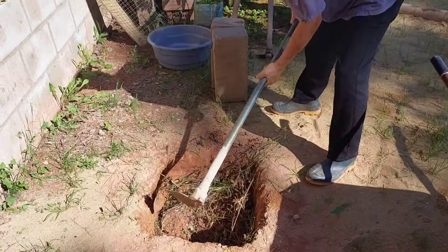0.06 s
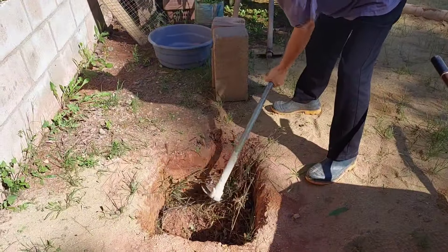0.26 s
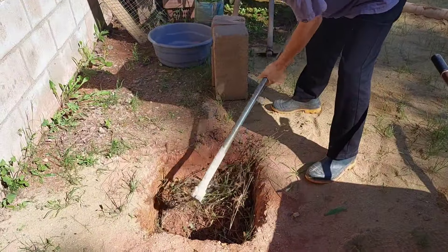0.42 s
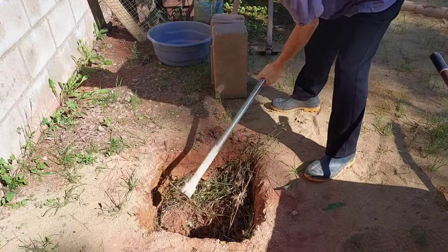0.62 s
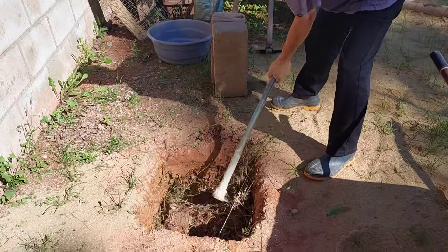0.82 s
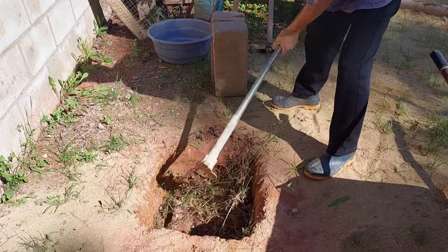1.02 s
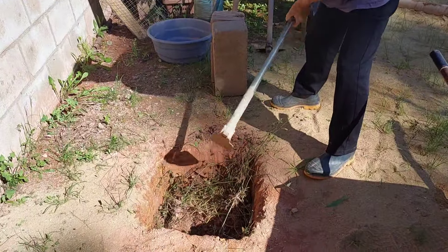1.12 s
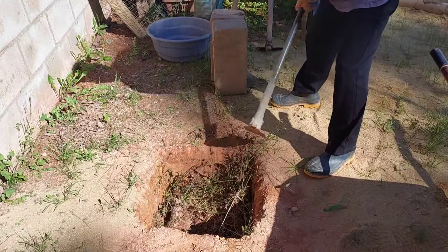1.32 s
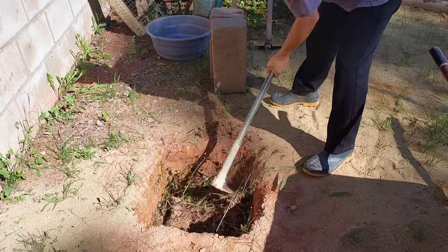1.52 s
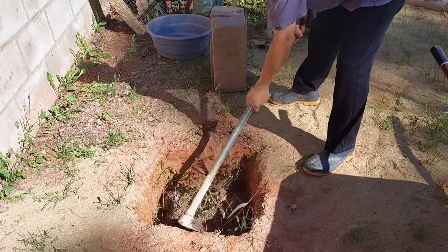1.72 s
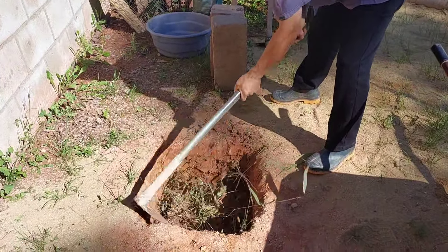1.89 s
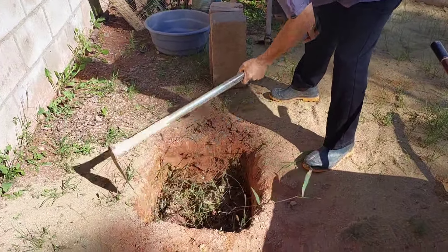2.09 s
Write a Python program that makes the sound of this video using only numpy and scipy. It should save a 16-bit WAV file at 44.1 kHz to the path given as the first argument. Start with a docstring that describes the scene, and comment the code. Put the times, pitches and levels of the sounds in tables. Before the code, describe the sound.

A metal hoe chops twice into soil and dry grass, then scrapes, with wind rumbling.

```python
"""Wind rumbles on the microphone and faint birds whistle over the quiet hiss of a garden.
A steel hoe chops twice into a pit of soil and cut grass: each blow crunches, thuds and shakes
the hoe. It scrapes in a third time, clips a pebble and drags the heap out. Grit rubbing along
the blade makes it ring, and crumbs and stalks rustle after each stroke."""
import sys
import numpy as np
from scipy import signal
from scipy.fft import rfft, irfft
from scipy.io import wavfile
from scipy.ndimage import uniform_filter1d

SR = 44100
rng = np.random.default_rng(int(sys.argv[2]) if len(sys.argv) > 2 else 0)


def transcribe(signal):
    """Save signal, clipped to [-1, 1], as a 16-bit WAV file at the path in sys.argv[1]."""
    frames = np.atleast_2d(signal).T
    limited = np.clip(frames, -1, 1)
    pcm = np.round(limited * 32767).astype(np.int16)
    wavfile.write(sys.argv[1], SR, pcm)


N = 94815
T = np.arange(N) / SR

# A TONE table says how strong each pitch is next to the others. "side" is left level minus right.
# outdoor hiss (f/Hz, level/dB)
AIR_TONE = [(150, -19.5), (250, 0.5), (407, -14), (674, -8.5), (1280, -20.5), (7310, -24), (9010, -30.5),
            (16000, -29)]
# how loud that hiss is over time (t/s, level/dB)
AIR_LEVEL = [(0, -60.5), (.6, -59), (1.3, -62)]
# gusts on the microphone (peak t/s, level/dB, rise/s, fall/s, added flutter/dB, side/dB)
GUSTS = [(0.041, -33, 0.037, 0.049, -9.5, 13), (0.271, -31, 0.019, 0.057, -8.5, 7),
         (0.469, -26.5, 0.038, 0.07, -24, 10.5), (0.534, -30.5, 0.011, 0.013, 5, 39),
         (0.593, -22, 0.008, 0.013, -18, 1.5), (0.642, -30, 0.014, 0.027, 5, 16.5),
         (0.764, -25.5, 0.025, 0.099, -8, -0.5), (0.865, -28, 0.039, 0.072, -21, -12),
         (1.127, -30.5, 0.036, 0.029, -19, 12), (1.179, -24.5, 0.038, .014, -46, 13.5),
         (1.32, -40, 0.084, 0.5, -12.5, 3.5), (1.565, -26, 0.0077, 0.0037, -19.5, 26),
         (1.661, -24, 0.009, 0.042, -11, 23), (1.804, -29, 0.041, 0.15, -12, 3.5)]
# deep rumble of the wind (f/Hz, level/dB)
WIND_TONE = [(20, -22.5), (46, 1), (60, 6), (80, 2), (170, -20.5), (250, -34.5), (1000, -73.5)]
# higher flutter of a gust (f/Hz, level/dB)
FLUTTER_TONE = [(40, -34), (90, 11), (160, -2), (330, -17.5), (1500, -67.5)]
# bird whistles (start t/s, length/s, first f/Hz, last f/Hz, level/dB, level change/dB, wander/share)
WHISTLES = [(0, 0.047, 4260, 3920, -65.5, -5.5, 0.024), (0.039, 0.044, 3740, 3370, -63.5, 7.5, 0.024),
            (0.143, 0.057, 3590, 3340, -73, 10, 0.012)]
# stalks brushed, crumbs sliding (peak t/s, level/dB, rise/s, fall/s, side/dB)
RUSTLES = [(.1855, -44.5, 0.0012, 0.015, 4.5), (.33, -54.5, 0.041, 0.068, 2), (.689, -44, 0.0042, 0.097, 3),
           (.77, -40.5, 0.01, 0.039, 0), (.865, -52, 0.019, 0.056, 2), (1.56, -43, 0.05, 0.12, 1.5),
           (1.63, -50.5, 0.13, 0.051, 3), (1.775, -50, 0.084, 0.15, 3), (1.942, -47.5, 0.0021, 0.0022, 7)]
# dry grass and earth (f/Hz, level/dB)
RUSTLE_TONE = [(150, -40.5), (500, 0.5), (1500, 0), (6000, 2), (9000, -2), (16000, 0)]
# stalks snapping, crumbs landing (t/s, level/dB, side/dB)
SNAPS = [(1.633, -48, 1), (1.711, -45, 15), (1.835, -44.5, 2)]
# blade driven into the soil (t/s, crunch/dB, clods/dB, time to stop/s, thud/dB, handle ring/dB,
# edge ping/dB, pivot f/Hz, crunch dip away from it/dB per octave, side/dB)
CHOPS = [(0.2098, -20, -28.5, 0.0015, -9, -20.5, -54, 2200, 0.5, 2),
         (0.7138, -23.5, -31, 0.0059, -16, -31, -26, 4040, 1.1, 2.5)]
# edge cutting stalks and soil (f/Hz, level/dB)
CRUNCH_TONE = [(100, 0.5), (820, 2), (1560, -0.5), (1800, -9.5), (2300, -5.5), (2900, -0.5), (3300, -10.5),
               (3900, -0.5), (4400, -9), (5000, -4), (6300, -5), (7200, -8.5), (9300, -11), (11200, -9),
               (16000, -18)]
# blade butting against hard earth (t/s, level/dB, side/dB)
KNOCKS = [(0.2096, -6.5, 2.5), (.2152, -14.5, 4), (0.7145, -20, -3), (.7235, -19.5, -1)]
# dull blow on earth (f/Hz, level/dB)
KNOCK_TONE = [(40, -27), (120, 1.5), (230, 1.5), (500, 3.5), (900, -7.5), (1700, -15), (2400, -9.5),
              (4000, -28.5), (16000, -54)]
# notes of the hoe held by the soil (f/Hz, level/dB, time to fade by 60 dB/s)
HANDLE_NOTES = [(219, 0, 0.055), (331.7, 3, 0.078), (519.4, 1.5, 0.1), (878, 2, 0.064), (1238, -17, 0.082),
                (2260, -3, 0.035), (2510, -4, 0.031), (5820, 5, 0.017)]
# notes of the buried edge (f/Hz, level/dB, time to fade by 60 dB/s)
EDGE_NOTES = [(1530, 1.5, 0.044), (2940, 2.5, 0.055), (6690, -4.5, 0.056)]
# blade singing on as it slides free (start t/s, length/s, f/Hz, level/dB, level change/dB)
RINGS = [(0.272, 0.055, 1390, -40.5, -5), (0.312, .11, 3540, -48, -18), (.332, 0.23, 2660, -48.5, -24)]
# blade sliding over grit (peak t/s, level/dB, rise/s, fall/s, blade ring/dB, pivot f/Hz,
# how much the ring dips (+) or rises (-) away from it/dB per octave, coarseness/dB, side/dB)
SCRAPES = [(0.2777, -38.5, .0009, 0.017, 6, 1920, 1.5, 4.5, -3),
           (0.294, -37, 0.0065, 0.014, 4, 7500, 0.5, -2, 1),
           (0.368, -47.5, 0.0032, 0.011, -0.5, 5500, 5, 1, 1),
           (1.4151, -35, 0.0038, 0.013, -12, 4500, -1.5, -2, 3),
           (1.426, -30.5, 0.0028, 0.012, -4.5, 5000, -3, 2, 2),
           (1.433, -36.5, 0.0036, 0.013, 4, 780, 3, 3.5, 0.5),
           (1.778, -60.5, 0.03, 0.013, 9.5, 6900, 8, 5, -3.5)]
# grit rubbing on steel (f/Hz, level/dB)
GRIT_TONE = [(100, -9), (400, -23), (700, 4), (1200, -5), (2700, 1), (5000, 6), (7500, 1.5), (9200, -0.5),
             (11000, 0.5), (16000, -6)]
# notes of the free blade (f/Hz, level/dB)
BLADE_NOTES = [(650, 0), (954, 1), (1374, -6), (1985, -7), (2265, -8), (2640, -2), (2865, -2), (4040, -5),
               (4875, -2), (5085, -5), (5615, -5), (6378, -7), (6826, 1), (7535, -9)]
# thin bird twitter (peak t/s, level/dB, rise/s, fall/s, side/dB)
TWITTERS = [(.585, -60, 0.034, 0.11, 1)]
# its narrow, high band (f/Hz, level/dB)
TWITTER_TONE = [(3000, -56), (5200, -8), (6000, 0), (6900, 0), (7700, -13), (9500, -46)]
# faint swishes (peak t/s, level/dB, rise/s, fall/s, side/dB)
SWISHES = [(.665, -45.5, 0.031, 0.057, 2.5), (1.055, -51, 0.023, 0.2, 3), (1.087, -45, 0.0056, 0.069, 0),
           (1.385, -51, 0.019, 0.17, 1.5)]
# their hollow sound (f/Hz, level/dB)
SWISH_TONE = [(200, -43.5), (480, -5.5), (630, 5.5), (730, 1), (910, 4.5), (1080, -10), (1800, -13),
              (2500, -46)]
# blade clipping a pebble (t/s, level/dB, fall/s, side/dB)
CLICKS = [(1.6639, -35, 0.0084, 0)]
# steel on stone (f/Hz, level/dB)
CLICK_TONE = [(400, -15), (950, -9), (2270, -1.5), (2600, -5), (2850, 5.5), (3300, 5), (3700, -9),
              (5100, 3.5), (6800, 2.5), (8000, -8.5), (16000, -9)]
# how far the left microphone opening is out of step with the right (f/Hz, phase/radians)
PORT_PHASE = [(250, 0.05), (850, 0.54), (1300, -1.75), (2400, -0.49), (3500, -0.95), (12000, -1.56)]

BREEZE_DB = -44
FLICKER_DB = 2.5  # unsteady level of the whistles and the singing blade
CRUMBS_PER_S, CRUMBS_DB, SNAP_S = 170, -4.5, 0.0031
ENTRY_S, ENTRY_DB, STOP_S, SETTLE_S, SETTLE_DB = 0.00478, -8, 0.0067, 0.019, -18  # stages of a chop
CLOD_S, CLOD_TAIL_DB = 0.012, 2.5
THUD_HZ, THUD_FADE_S, THUD_RISE_S = 107.8, 0.046, 0.0034
SING_RAMP_S, SING_WANDER_HZ = 0.013, 11
BLADE_WIDTH_HZ = 24  # width of a blade note at 1 kHz; wider notes die sooner
CLICK_RISE_S = 0.00052
LOW_CUT_HZ, HIGH_CUT_HZ = 32, 16000


def amp(db):
    """Turns decibels into a number to multiply by."""
    return 10 ** (np.asarray(db) / 20)


def unit(x):
    """Scales a signal to an average strength (rms) of 1."""
    return x / np.sqrt(np.mean(x ** 2) + 1e-20)


def pan(db):
    """Left and right gains for a level difference."""
    gains = amp(np.array([db, -db]).reshape(2, -1) / 2)
    return gains / np.sqrt(np.mean(gains ** 2, 0))


def response(tone, size=8192):
    """The sound of one tiny tap with the given tone, scaled to an energy of 1."""
    hz, db = np.transpose(tone)
    bins_hz = abs(np.fft.fftfreq(size, 1 / SR))
    log_gain = np.log(amp(np.interp(np.log(bins_hz + 1), np.log(hz + 1), db)))
    tap = np.fft.ifft(np.exp(np.conj(signal.hilbert(log_gain)))).real[:size // 2]
    return tap / np.linalg.norm(tap)


def colour(x, tap):
    """Gives both channels the tone of a tap."""
    return signal.fftconvolve(x, tap[None], axes=1)[:, :N]


def noise(alike, grain_db=0):
    """Stereo noise; alike is the share both sides have in common, grain_db makes it gritty."""
    both, left, right = rng.standard_normal((3, N))
    grains = amp(grain_db * np.minimum(rng.exponential(1, N // 8 + 1), 4.5)).repeat(8)[:N]
    return unit(grains * (np.sqrt(alike) * both + np.sqrt(1 - alike) * np.array([left, right])))


def swell(s, rise, fall):
    """A level that climbs smoothly to a peak at time s, then dies away."""
    return np.exp(-(np.minimum(T - s, 0) / rise) ** 2 / 2 - np.maximum(T - s, 0) / fall)


def swells(rows):
    """Left and right level of overlapping swells."""
    powers = ((amp(db) * pan(side) * swell(s, rise, fall)) ** 2 for s, db, rise, fall, side in rows)
    return np.sqrt(sum(powers))


def waver(size):
    """Random drift, smoothed over size samples."""
    return unit(uniform_filter1d(uniform_filter1d(rng.standard_normal(N), size), size))


def struck(notes, t):
    """The dying notes of a struck object."""
    return sum(amp(db - 60 * t / t60) * np.sin(2 * np.pi * (hz * t + rng.random()))
               for hz, db, t60 in notes)


def tilt(tone, pivot_hz, dip_db):
    """Lowers a tone by dip_db for each octave away from the pivot; a negative dip_db raises it."""
    return [(hz, db - dip_db * abs(np.log2(hz / pivot_hz))) for hz, db in tone]


def echoes(x, wet_db, t60):
    """Adds short, thin echoes from the wall and the yard."""
    t = T[:SR // 2]
    taps = rng.standard_normal((2, len(t))) * (rng.random((2, len(t))) < 2000 / SR)
    taps *= amp(-60 * t / t60) * (t > .008)
    return x + amp(wet_db) * signal.fftconvolve(x, taps / np.linalg.norm(taps[0]), axes=1)[:, :N]


def air():
    """Quiet outdoor hiss, stronger on the left."""
    level = amp(np.interp(T, *np.transpose(AIR_LEVEL))) * pan(5.5)
    return level * colour(noise(0.12, grain_db=2.0), response(AIR_TONE))


def wind():
    """Air swirls at the microphone: a light breeze and gusts, the sharper ones with a flutter."""
    rumble = colour(noise(0.09), response(WIND_TONE))
    rumble /= np.sqrt(uniform_filter1d(rumble ** 2, size=1300, axis=1) + 1e-9)  # even out its level
    gusts = swells([(s, db, rise, fall, side) for s, db, rise, fall, _, side in GUSTS])
    flutter = swells([(s, db + extra, rise, fall, side) for s, db, rise, fall, extra, side in GUSTS])
    level = np.hypot(gusts, amp(BREEZE_DB) * pan(5.5))
    return rumble * level + colour(flutter * noise(0.52), response(FLUTTER_TONE))


def bird_whistles():
    """Faint whistles slide down in pitch, smeared by the yard."""
    out = np.zeros((2, N))
    for s, length, first_hz, last_hz, db, change_db, wander in WHISTLES:
        progress = np.clip((T - s) / length, 0, 1)
        hz = (first_hz + (last_hz - first_hz) * progress) * (1 + wander * waver(70))
        gate = np.minimum(np.minimum(progress, 1 - progress) * length / 0.0054, 1)
        level = amp(db + change_db * progress + FLICKER_DB * waver(450))
        out += gate * level * np.sin(2 * np.pi * np.cumsum(hz) / SR)
    return echoes(out, wet_db=2, t60=.3)


def loose_soil():
    """Fine earth and dry grass rustle, with larger crumbs and a few clear snaps among them."""
    snaps = swells([(s, db, SNAP_S / 10, SNAP_S, side) for s, db, side in SNAPS])
    crumbs = unit(rng.uniform(-1.02, 1, (2, N)) * (rng.random(N) < CRUMBS_PER_S / SR))
    grains = noise(0.44, grain_db=0.5) + amp(CRUMBS_DB) * crumbs
    return colour(swells(RUSTLES) * unit(grains) + snaps * noise(0.86), response(RUSTLE_TONE))


def chops():
    """The edge cuts stalks, crunches to a stop in the clods, knocks the ground and shakes the hoe."""
    out = np.zeros((2, N))
    blow = response(KNOCK_TONE)
    for s, crunch_db, clod_db, stop, thud_db, ring_db, ping_db, pivot_hz, dip_db, side in CHOPS:
        t = np.maximum(T - s, 0)
        since_stop = np.maximum(t - stop, 0)
        entering = amp(ENTRY_DB) * np.exp(-abs(T - s) / ENTRY_S)
        settling = np.exp(-since_stop / STOP_S) + amp(SETTLE_DB) * np.exp(-since_stop / SETTLE_S)
        cut = np.where(T < s, entering, settling)
        tone = response(tilt(CRUNCH_TONE, pivot_hz, dip_db))
        crunch = amp(crunch_db) * colour(cut * noise(0.76, grain_db=4.0), tone)
        crumble = (T > s) * np.maximum(cut, amp(CLOD_TAIL_DB) * np.exp(-since_stop / CLOD_S))
        clods = amp(clod_db) * colour(crumble * noise(1.0), blow)
        thud_level = amp(thud_db - 60 * t / THUD_FADE_S) * (1 - np.exp(-t / THUD_RISE_S))
        thud = thud_level * np.sin(2 * np.pi * THUD_HZ * t)
        ring = amp(ring_db) * struck(HANDLE_NOTES, t) + amp(ping_db) * struck(EDGE_NOTES, t)
        out += pan(side) * (crunch + clods + thud + ring * (1 - np.exp(-t / 0.0016)))
    knocks = sum(amp(db) * pan(side) * (np.arange(N) == round(s * SR)) for s, db, side in KNOCKS)
    return out - colour(knocks, blow / abs(blow).max())


def singing_blade():
    """Single notes of the blade swell, waver and fade as it slides out of the soil."""
    out = np.zeros(N)
    for s, length, hz, db, change_db in RINGS:
        progress = np.clip((T - s) / length, 0, 1)
        gate = np.minimum(np.minimum(progress, 1 - progress) * length / SING_RAMP_S, 1)
        cycles = np.cumsum(hz + SING_WANDER_HZ * waver(300)) / SR
        level = amp(db + change_db * progress + FLICKER_DB * waver(600))
        out += gate * level * np.sin(2 * np.pi * cycles)
    return out


def scrapes():
    """Grit rubs the blade and sets it ringing; where it touches changes the mix of its notes."""
    t = T[:SR // 4]
    out = np.zeros((2, N))
    for s, db, rise, fall, ring_db, pivot_hz, dip_db, coarse_db, side in SCRAPES:
        blade = np.zeros(len(t))
        for hz, note_db in tilt(BLADE_NOTES, pivot_hz, dip_db):
            width = BLADE_WIDTH_HZ * np.sqrt(hz / 1000)
            blade += amp(note_db) * width * np.exp(-np.pi * width * t) * np.sin(2 * np.pi * hz * t)
        stroke = amp(db) * pan(side) * swell(s, rise, fall)
        out += colour(stroke * noise(0.033, grain_db=coarse_db), response(GRIT_TONE))
        out += amp(ring_db) * colour(stroke * noise(0.58), blade / np.linalg.norm(blade))
    return out


def bird_twitter():
    """A thin, high twitter, heard as a brief swell of hiss."""
    return colour(swells(TWITTERS) * noise(0.25), response(TWITTER_TONE))


def swishes():
    """Soft, hollow rushes of middle pitch."""
    return colour(swells(SWISHES) * noise(0.27), response(SWISH_TONE))


def pebble_click():
    """A dry click of steel on a pebble, muffled by the soil."""
    level = swells([(s, db, CLICK_RISE_S, fall, side) for s, db, fall, side in CLICKS])
    return colour(level * noise(0.8, grain_db=1.5), response(CLICK_TONE))


def microphone_ports(x):
    """The microphone's two openings hear the hoe slightly out of step."""
    turn = np.interp(np.fft.rfftfreq(2 * N, 1 / SR), *np.transpose(PORT_PHASE))
    left = irfft(rfft(x[0], 2 * N) * np.exp(1j * turn))[:N]
    return np.array([left, x[1]])


def scene():
    """The hoe in the garden, with wind and birds."""
    blows = echoes(chops(), wet_db=-17.5, t60=0.36)
    hoe = blows + scrapes() + pebble_click() + singing_blade() + loose_soil() + swishes()
    return microphone_ports(hoe) + wind() + bird_whistles() + bird_twitter() + air()


def record(dry):
    """Removes the deepest rumble and the highest hiss."""
    low_cut = signal.butter(4, LOW_CUT_HZ, "highpass", fs=SR, output="sos")
    high_cut = signal.firwin(511, HIGH_CUT_HZ, window=("kaiser", 9), fs=SR)
    return signal.oaconvolve(signal.sosfilt(low_cut, dry), high_cut[None], "same")


dry = scene()
out = record(dry)
transcribe(out)
```